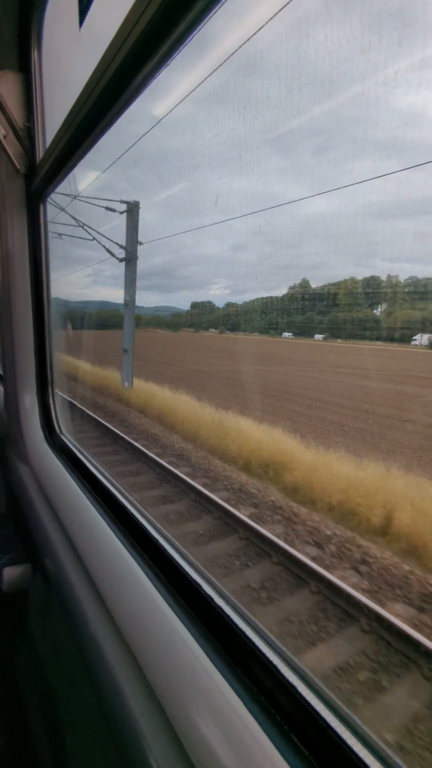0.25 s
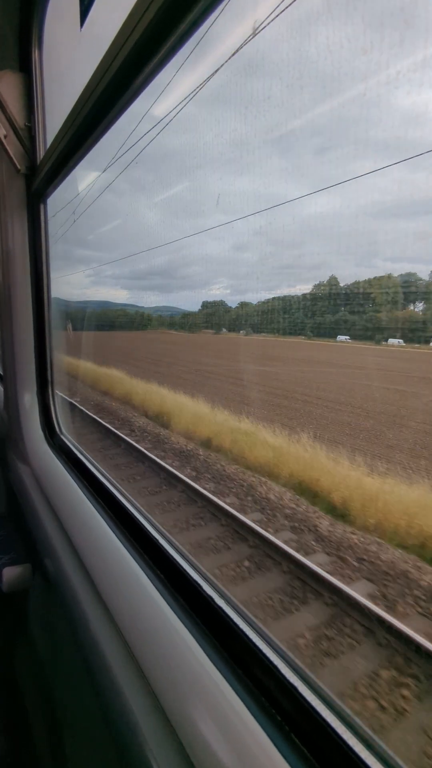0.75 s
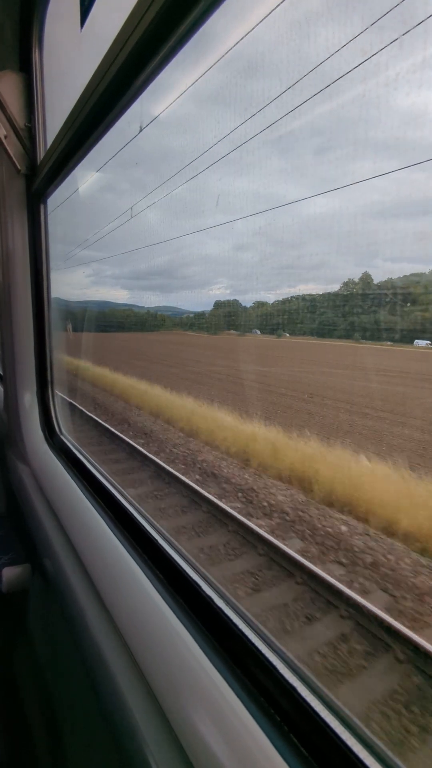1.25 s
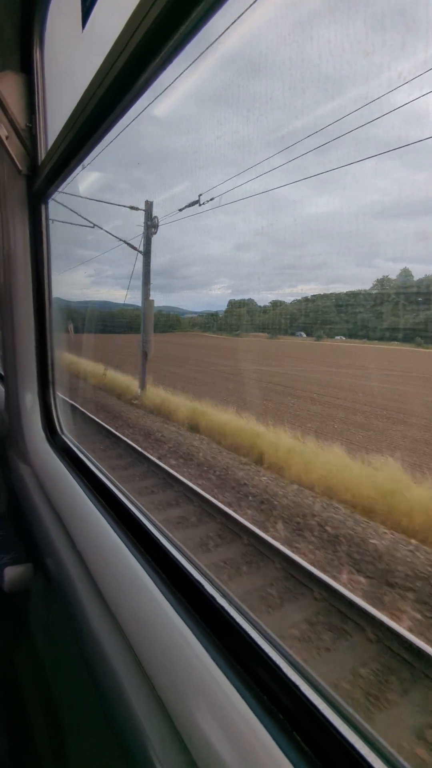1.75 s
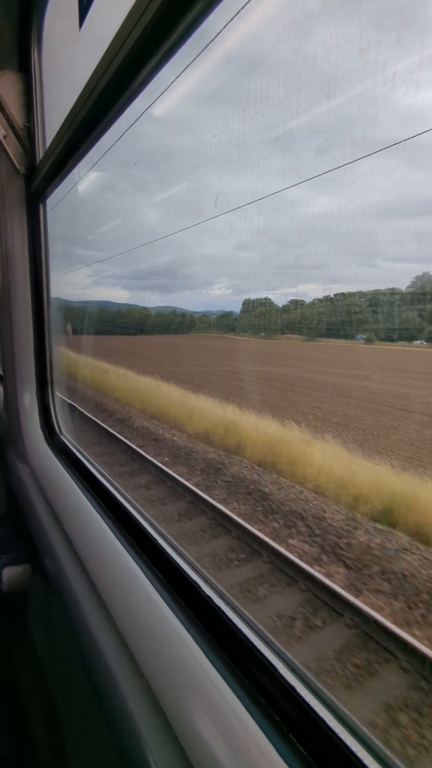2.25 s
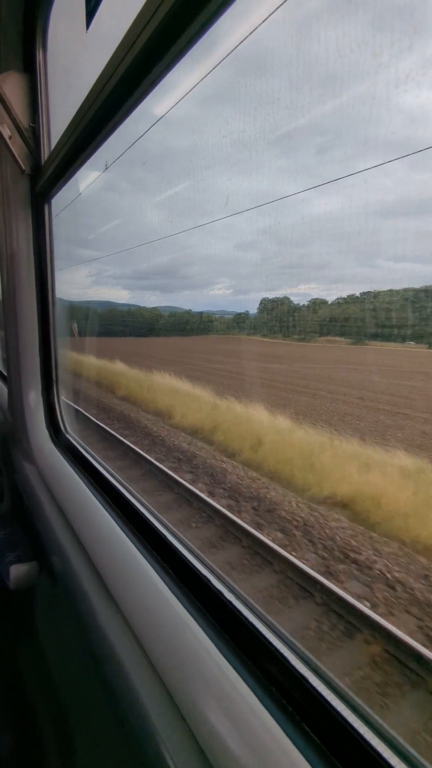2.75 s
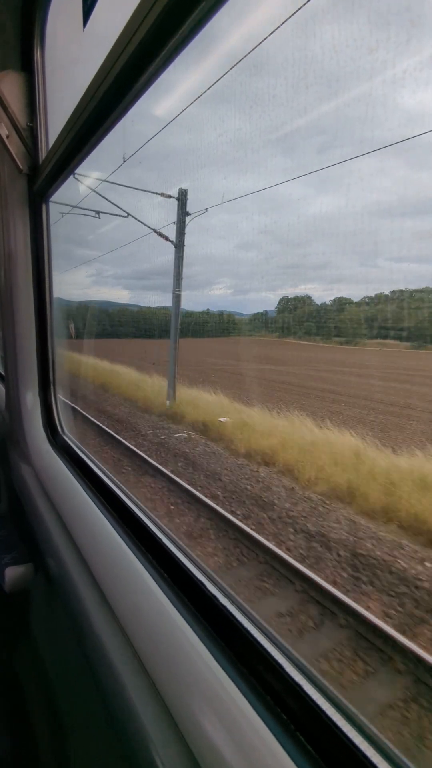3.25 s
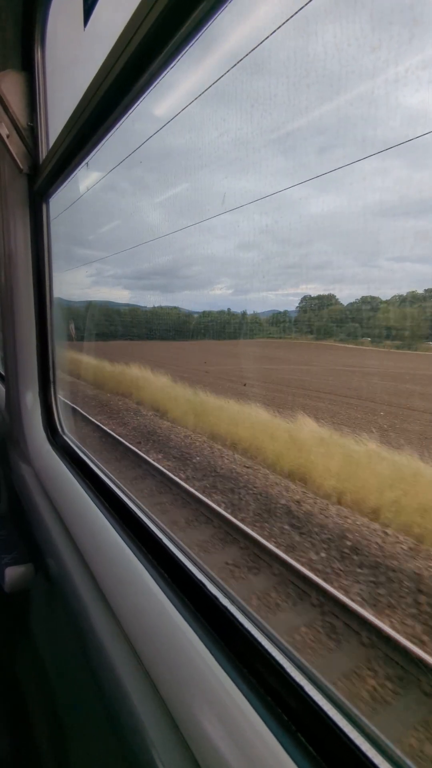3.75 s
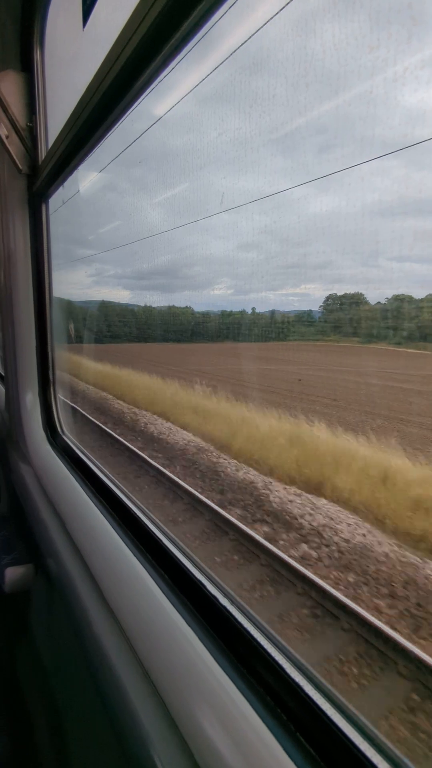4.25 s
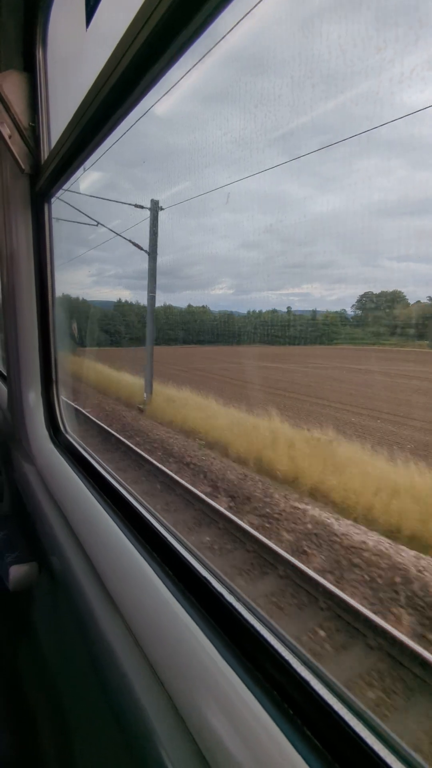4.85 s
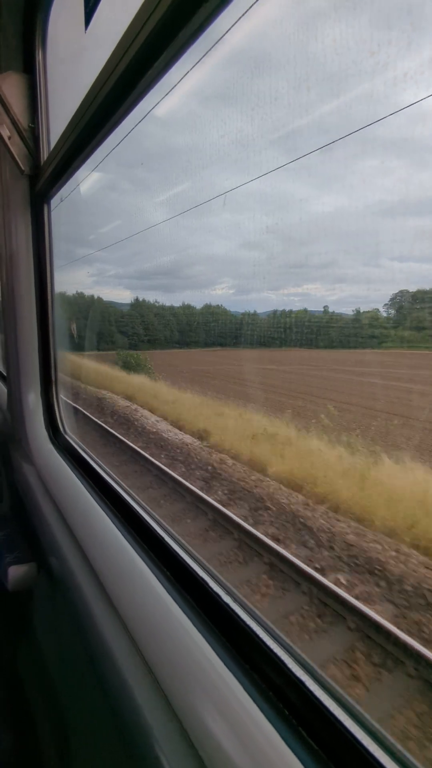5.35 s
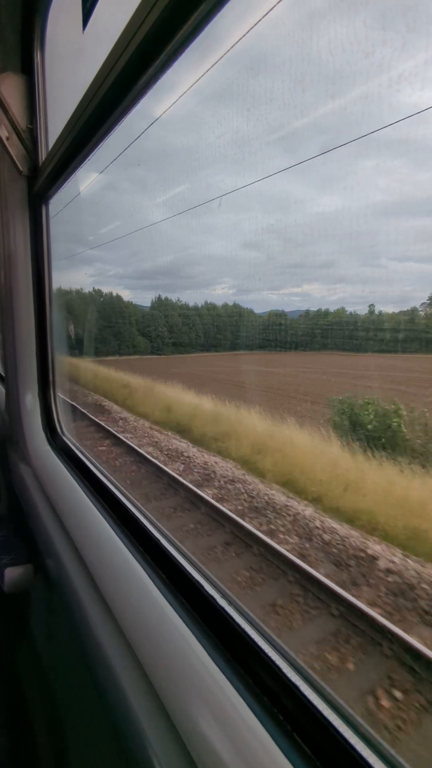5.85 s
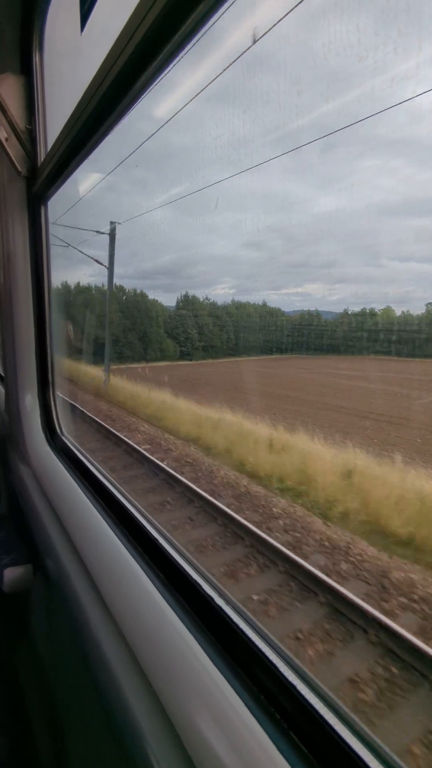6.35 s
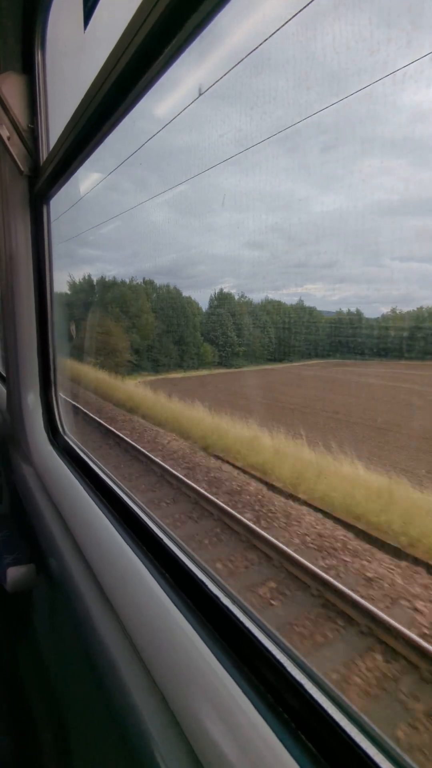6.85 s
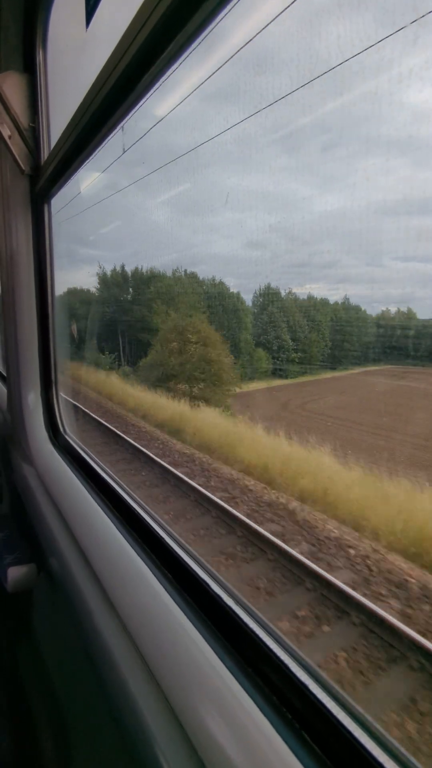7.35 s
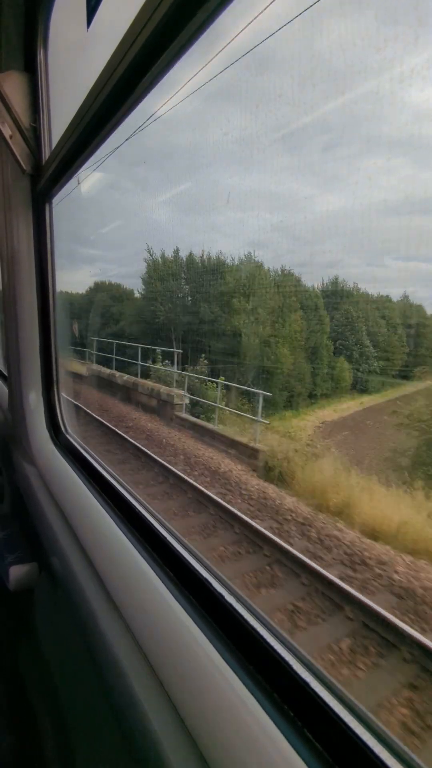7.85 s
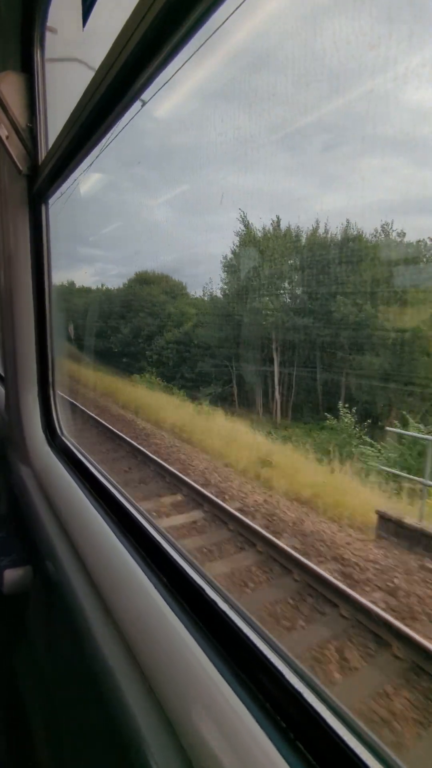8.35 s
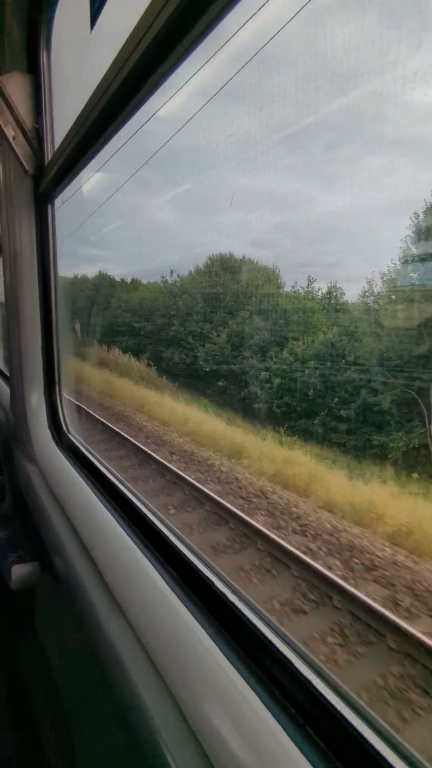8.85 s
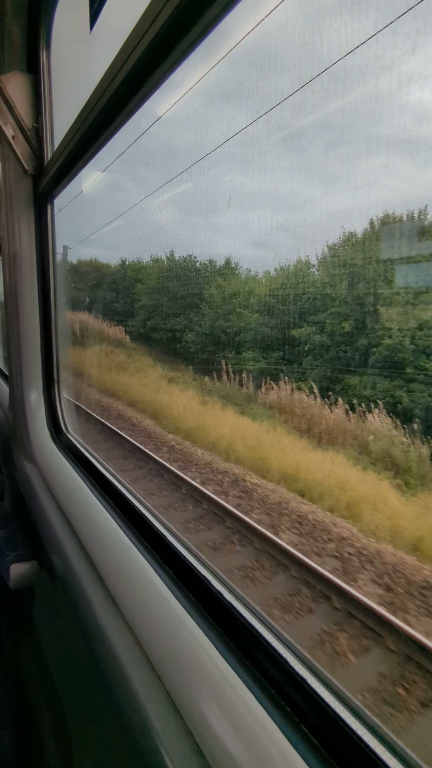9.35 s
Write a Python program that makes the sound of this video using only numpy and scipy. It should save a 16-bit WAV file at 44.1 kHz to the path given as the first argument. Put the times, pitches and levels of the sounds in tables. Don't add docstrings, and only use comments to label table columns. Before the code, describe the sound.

Train cabin by the window: steady deep drone and rail roar, faint air hiss, a thin gear whine edging upward, occasional muffled knocks and trim squeaks.

```python
import sys
import numpy as np
from scipy import signal
from scipy.fft import rfft, irfft, next_fast_len
from scipy.io import wavfile
from scipy.ndimage import uniform_filter1d, map_coordinates

SR = 44100
rng = np.random.default_rng(int(sys.argv[2]) if len(sys.argv) > 2 else 0)


def file_out(sig):
    cols = np.atleast_2d(sig).T
    lim = np.clip(cols, -1, 1)
    pcm = np.round(lim * 32767).astype(np.int16)
    wavfile.write(sys.argv[1], SR, pcm)


def amplitude_ratio(level_db):
    exponent = np.asarray(level_db, float) / 20
    return 10 ** exponent


N = 422919
TIME = np.arange(N) / SR
SLOW = TIME[::64]
MIDDLE_HZ = 67.3


def unit(x):
    return x / np.sqrt(np.mean(x ** 2) + 1e-20)


def along(points, hz):
    f, v = np.transpose(points)
    return np.interp(np.log(hz + 1), np.log(f + 1), v)


def curves(rows):
    s, *columns = np.transpose(rows)
    return [np.interp(TIME, s, column) for column in columns]


def fine(x):
    return np.interp(TIME, SLOW, np.broadcast_to(x, SLOW.shape))


def drift(rate):
    knots = rng.standard_normal(int(N * rate / SR) + 4)
    return map_coordinates(knots, [SLOW * rate])


def wobble(rate):
    return fine(drift(rate))


def swell(s, length):
    out = np.zeros(N)
    span = slice(int(s * SR), int((s + 5 * length) * SR))
    u = np.clip((TIME[span] - s) / length * 3, 0, 40)
    out[span] = u * np.exp(1 - u)
    return out


def dips(rows, width_s):
    return fine(sum(db * np.exp(-((SLOW - s) / width_s) ** 2) for s, db in rows))


def beat(partner_db, cycles):
    partner = amplitude_ratio(np.broadcast_to(partner_db, N)[::64])
    pair = 1 + partner * np.exp(2j * np.pi * cycles[::64])
    return fine(20 * np.log10(np.abs(pair) + .03))


def sine(cycles, radians):
    return np.sin((2 * np.pi * (cycles % 1) + radians).astype(np.float32))


def tone(cycles, left_db, right_db, lead):
    cycles = cycles + rng.random()
    left = fine(amplitude_ratio(np.broadcast_to(left_db, N)[::64]))
    right = fine(amplitude_ratio(np.broadcast_to(right_db, N)[::64]))
    return np.sqrt(2) * np.array([left * sine(cycles, lead / 2), right * sine(cycles, -lead / 2)])


def faint(rows, clock, fade_db, rate):
    out = np.zeros((2, N))
    for hz, *db, lead in rows:
        cycles = hz * clock + .05 * wobble(6) + rng.random()
        flicker = fade_db * drift(3 * rate)
        for side, early_late in enumerate((db[:2], db[2:])):
            level_db = np.interp(SLOW, [2.4, 7.2], early_late) + 2
            gain = amplitude_ratio(level_db + fade_db * drift(rate) + flicker)
            out[side] += fine(gain) * sine(cycles, -side * lead)
    return out


# (frequency [Hz], correlation)
ALIKE = [(61, .97), (152, .95), (193, .3), (250, .85), (400, .75), (490, .1), (620, .55), (720, 0),
         (1250, -.3), (1800, 0), (7000, .03), (10000, .2), (14000, .15)]
# (frequency [Hz], left minus right [dB])
LEFT_TILT = [(151, 0), (182, 3), (262, -3), (405, -2), (525, 3), (810, 0), (1720, -4), (2320, 0), (3220, 4),
             (5350, -3.5), (7050, 0), (10100, 3), (13100, -1.5)]


def rush(spectrum, patchy_db):
    z = rng.standard_normal((2, 257, N // 128 // 2 * 2 + 8), np.float32).view(np.complex64)
    field = rng.standard_normal(z.shape[1:], np.float32)
    field = uniform_filter1d(field, size=6, axis=0)
    field = uniform_filter1d(field, size=12, axis=1)
    pair = signal.istft(z * amplitude_ratio(patchy_db * unit(field)), window="cosine", nperseg=512)[1]
    m = next_fast_len(N + 8192)
    hz = np.fft.rfftfreq(m, 1 / SR)
    turn = np.arccos(np.clip(along(ALIKE, hz), -1, 1)) / 2
    mid, side = rfft(pair, m) * amplitude_ratio(along(spectrum, hz)) * [np.cos(turn), np.sin(turn)]
    tilt = amplitude_ratio(along(LEFT_TILT, hz) / 2)
    return unit(irfft([(mid + side) * tilt, (mid - side) / tilt], m)[:, :N])


# (frequency [Hz], level [dB])
HISS = [(1810, -120), (3020, 3.5), (3480, -.5), (3900, .5), (4250, -1), (4950, -6.5), (5750, -7.5),
        (6280, -4.5), (6950, -9.5), (7550, -10.5), (8050, -17), (11100, -120)]
# (frequency [Hz], level [dB])
AIR = [(6050, -120), (7900, -6), (8850, -1), (10300, 0), (10950, -6), (12300, -11), (13500, -17),
       (14600, -18), (15600, -15), (17200, -120)]


def vent():
    draught, gust = wobble(1.4), wobble(8)
    hiss_db = -54 + 0.18 * TIME + 0.55 * draught + .5 * gust
    air_db = -69.5 + 0.39 * TIME + .5 * draught + .6 * gust + .9 * wobble(15)
    return amplitude_ratio(hiss_db) * rush(HISS, patchy_db=1.1) + amplitude_ratio(air_db) * rush(AIR, patchy_db=2.0)


# (frequency [Hz], left early [dB], left late [dB], right early [dB],
# right late [dB], left lead [rad])
MAINS = [(100, -38, -46, -40, -46, 0.0), (800, -60, -61, -55, -59, 2.8), (1500, -55, -58, -50, -55, 1.8),
         (1543, -58, -66, -51, -67, 1.7), (1600, -60, -63, -51, -58, 2.3), (2700, -55, -60, -66, -68, -0.6),
         (2800, -62, -68, -61, -65, 0.1)]


def converter():
    return faint(MAINS, TIME, fade_db=2.0, rate=1.1)


# (time [s], level [dB])
PANEL = [(0, -45), (.6, -44.5), (1.5, -50.5), (3.5, -48.5), (4.3, -42), (5, -54.5), (6, -49.5), (9.6, -59)]


def panel():
    level_db = curves(PANEL)[0] - 2 + 4 * wobble(14)
    return tone(1027.5 * TIME + 0.3 * wobble(16), level_db, level_db, .3)


# (time [s], peak level [dB])
RUSTLES = [(0.5617, -51.5), (2.1435, -52.5), (2.5794, -57), (3.0625, -53.5), (3.7994, -56), (3.8684, -54),
           (4.126, -52.5), (5.2594, -52), (5.67, -53), (5.8894, -55.5), (6.6794, -51), (6.9496, -55.5),
           (7.4147, -52.5), (7.8496, -56.5), (8.042, -54), (8.666, -52), (8.8174, -53), (9.1394, -52.5),
           (9.2239, -48.5), (9.3092, -52.5), (9.3994, -54), (9.4794, -49.5)]


def rustles():
    bursts = sum(amplitude_ratio(db - 10.5) * swell(s, .035) for s, db in RUSTLES)
    return bursts * rush(AIR, patchy_db=2.5)


# (time [s], level [dB], length [s])
SCRAPES = [
    (.76, -55, .05),
    (2.68, -52, .07),
    (7.82, -53, .06),
    (8.51, -55, .04),
    (8.65, -44, .07),
]


def scrapes():
    spectrum = [(1250, -120), (2450, 6), (3900, 0), (7400, -16), (11200, -23), (16000, -120)]  # Hz, dB
    bursts = sum(amplitude_ratio(db) * swell(s, length) for s, db, length in SCRAPES)
    return bursts * rush(spectrum, patchy_db=1)


# (time [s], level [dB], pitch [Hz], length [s], glide [share of pitch])
SQUEAKS = [
    (2.99, -56.5, 4270, .035, -.015),
    (3.058, -56.5, 4270, .04, -.015),
    (3.128, -55.5, 4270, .04, -.015),
    (3.2, -63, 4200, .05, -.02),
    (5.89, -51, 4260, .042, -.01),
    (7.78, -40, 2575, .075, 0),
]


def squeaks():
    out, rough = np.zeros(N), .15 * wobble(150)
    for s, db, hz, length, glide in SQUEAKS:
        t = TIME - s
        cycles = hz * (t + glide * t * t / length / 2) + rough
        out += amplitude_ratio(db + 3) * swell(s, length) * sine(cycles, 0)
    return out


# (frequency [Hz], level [dB])
RUMBLE = [(15, -42.5), (25, -26.5), (40, -12.5), (56, 5), (95, -2), (110, -6), (145, -1), (175, -6),
          (200, 2), (260, 2), (310, -0.5), (370, -5), (420, -10), (700, -120)]
# (frequency [Hz], level [dB])
ROAR = [(250, -120), (430, 4.5), (520, 11.5), (570, 6.5), (660, 4), (720, 0), (900, 0), (1080, 2.5),
        (1400, -1.5), (2000, -2), (2300, -3.5), (2650, -5), (3100, -19.5), (6000, -120)]


def rolling():
    rumble = amplitude_ratio(-24.5 + 0.52 * wobble(4)) * rush(RUMBLE, patchy_db=1.26)
    roar_db = -31.5 + 0.28 * wobble(1.5) + 0.19 * wobble(7.9)
    return rumble + amplitude_ratio(roar_db) * rush(ROAR, patchy_db=1.03)


# (time [s], peak level [dB], length [s])
JOINTS = [(0.423, -38, 0.071), (0.753, -32, 0.043), (1.916, -24, 0.047), (2.215, -28, 0.042),
          (2.73, -28, 0.041), (4.042, -32, 0.067), (4.431, -29, 0.065), (5.032, -25, 0.065),
          (6.12, -24.5, 0.055), (7.701, -26, 0.054), (8.05, -25.5, 0.1), (9.143, -25, 0.039)]


def joints():
    spectrum = [(150, -120), (350, 3.5), (700, -1.0), (1050, 4), (1400, -4.0), (3000, -30.5), (6000, -120)]
    surges = sum(amplitude_ratio(db - 5.5) * swell(s, length) for s, db, length in JOINTS)
    return surges * rush(spectrum, patchy_db=1.0)


def thump():
    return swell(6.24, length=0.14) * tone(61.8 * TIME, -21, -21, 0)


# (time [s], motor shaft [Hz])
SHAFT = [(0, 66.359), (2.4, 66.817), (4.8, 67.294), (7.2, 67.789), (9.6, 68.302)]


def speed_clock():
    return np.cumsum(curves(SHAFT)[0] / MIDDLE_HZ) / SR


# (frequency at middle speed [Hz], left early [dB], left late [dB],
# right early [dB], right late [dB], left lead [rad])
TURNING = [(335.8, -39, -46, -39, -42, -0.3), (397.7, -38, -45, -37, -39, 0.2),
           (526.9, -44, -53, -46, -47, 1.2), (593.5, -47, -48, -46, -52, 0.2),
           (639.3, -46, -53, -46, -58, 1.2), (660.8, -49, -43, -49, -54, 0.8),
           (740.2, -53, -57, -49, -51, 2.3), (1144, -52, -55, -50, -58, -2.3),
           (1275.2, -57, -57, -56, -52, -3.0), (1278.5, -55, -49, -50, -50, -2.6),
           (2422.5, -47, -58, -51, -51, -0.5), (2426.5, -54, -53, -52, -53, 1.2),
           (2557.1, -50, -58, -48, -54, -0.7), (2727.3, -56, -61, -61, -69, 0.4)]


def turning(clock):
    return faint(TURNING, clock, fade_db=2.5, rate=3.0)


def axle(clock):
    level_db = -39.5 + 1.4 * np.minimum(TIME, 5.4) + 2.2 * wobble(2.5)
    return tone(59.3 * clock + 0.1 * wobble(2.53), level_db, level_db, .1)


# (time [s], dip [dB], a flare if negative)
SLIPS = [(1.38, 6), (2.0, 9), (2.33, 12), (2.55, 7), (2.75, 7), (3.34, -4.5), (3.45, 2), (4.78, 5),
         (5.62, 6), (6.63, 3), (7.07, 10), (7.33, 7), (7.46, -5), (8.16, 11), (8.62, 7), (9.48, 9)]
# (time [s], left level [dB], right level [dB])
WHINE = [(0, -41.5, -34), (.5, -40, -32), (1, -41.5, -36), (1.4, -40, -44), (1.6, -37.5, -37.5),
         (2, -44, -45), (2.5, -44, -45), (3, -35, -42.5), (3.5, -33, -41.5), (4.4, -30.5, -43.5),
         (4.75, -34, -39), (5.05, -30, -47.5), (5.6, -33.5, -42), (6.35, -30.5, -42.5), (7.1, -37, -43),
         (7.9, -35.5, -49), (8.4, -31.5, -44), (9.6, -36, -44)]
# (time [s], level [dB])
THIN_WHINE = [(0, -75), (1.6, -68), (3.5, -68), (4.5, -71), (7, -69), (9.6, -73)]


def gear_whine(clock):
    wheel_hz, flare_s = 4.62, 3.76
    left_db, right_db = curves(WHINE) - dips(SLIPS, width_s=.035)
    partner_db = -49.5 + beat(-3, (TIME - 3.8) / 4.0)
    wheel_turns = wheel_hz * (clock - clock[round(flare_s * SR)])
    left_db = left_db + beat(partner_db - left_db, wheel_turns) + 1.0 * wobble(14)
    right_db = right_db + 3 * wobble(13)
    lead = -.4 - .75 * np.clip(TIME - 2.4, 0, None)
    mesh = 2151.2 * clock + 0.055 * wobble(8) + 0.038 * wobble(22)
    thin_db = curves(THIN_WHINE)[0] + 3.5 * wobble(12)
    thin = tone(57 * MIDDLE_HZ * clock + .06 * wobble(6), thin_db - 3, thin_db, -.3)
    return tone(mesh, left_db, right_db, lead) + thin


def motor_shafts(clock):
    null_s, null_gap_s = 5.7, 6.14
    shaft_db = -26 - 0.63 * TIME + beat(0, (TIME - null_s) / null_gap_s + .5) + 0.89 * wobble(2.5)
    shaft = tone(MIDDLE_HZ * clock, shaft_db - .4, shaft_db, -.1)
    null_s, null_gap_s = 5.6, 5.2
    octave_db = -41 + 0.17 * TIME + beat(0, (TIME - null_s) / null_gap_s + .5) + 2.6 * wobble(2.5)
    return shaft + tone(2 * MIDDLE_HZ * clock + 0.033 * wobble(3.7), octave_db, octave_db, 0)


# (time [s], drone level [dB], overtone level [dB])
DRONE = [(0, -23, -34.5), (1.4, -19, -37), (2.6, -18, -33.5), (3.8, -17, -39.5), (5, -16, -38),
         (5.9, -13, -33), (7.3, -14.5, -28), (7.68, -14.5, -32), (8.1, -14, -26.5), (8.6, -16.5, -30),
         (9.6, -14.5, -34.5)]
# (time [s], dip [dB], a flare if negative)
JOLTS = [(.1, 2), (2.46, -3), (2.75, 4), (3.65, 2), (4.37, -2.5), (4.8, 3), (6.18, 4.5), (8.1, 5),
         (8.33, -2.5), (8.72, 6.5), (9.25, 1.5)]


def blower_drone(clock):
    offset_hz, flare_s = 5.4, 1.72
    drone_db, overtone_db = curves(DRONE)
    neighbour_db = -32 - 1.3 * TIME
    drone_db = drone_db + beat(neighbour_db - drone_db, offset_hz * (TIME - flare_s))
    drone_db = drone_db + 0.9 * wobble(12) - dips(JOLTS, width_s=.06)
    lean_db = np.interp(TIME, [6.5, 7.5], [-4.5, -2.5])
    drone = tone(263.35 * clock + 0.016 * wobble(6.2), drone_db + lean_db, drone_db, -.15)
    overtone_db = overtone_db + 1.3 * wobble(5)
    return drone + tone(330.4 * clock + 0.032 * wobble(6.2), overtone_db - 2.0, overtone_db, -0.48)


def traction():
    clock = speed_clock()
    return turning(clock) + axle(clock) + gear_whine(clock) + motor_shafts(clock) + blower_drone(clock)


def scene():
    cabin = vent() + converter() + panel() + rustles() + scrapes() + squeaks()
    track = rolling() + joints() + thump()
    return cabin + track + traction()


def roll_off(x):
    return signal.sosfilt(signal.butter(12, 15770, fs=SR, output="sos"), x)


def record(dry):
    edges = np.clip(np.minimum(TIME, TIME[::-1]) / .003, 0, 1)
    return roll_off(dry * edges)


dry = scene()
out = record(dry)
file_out(out)
```